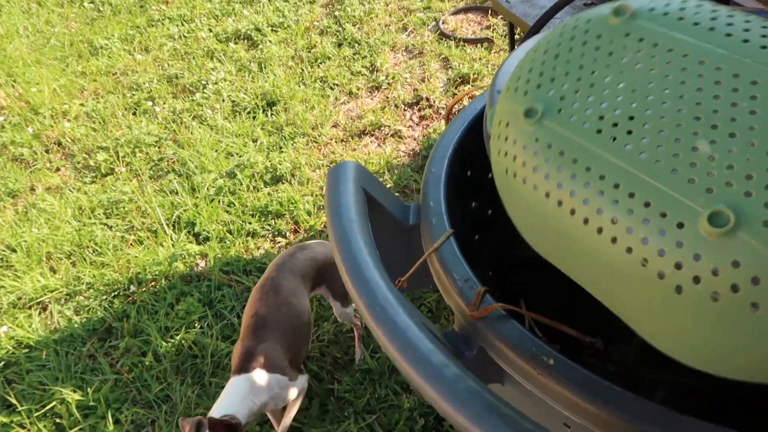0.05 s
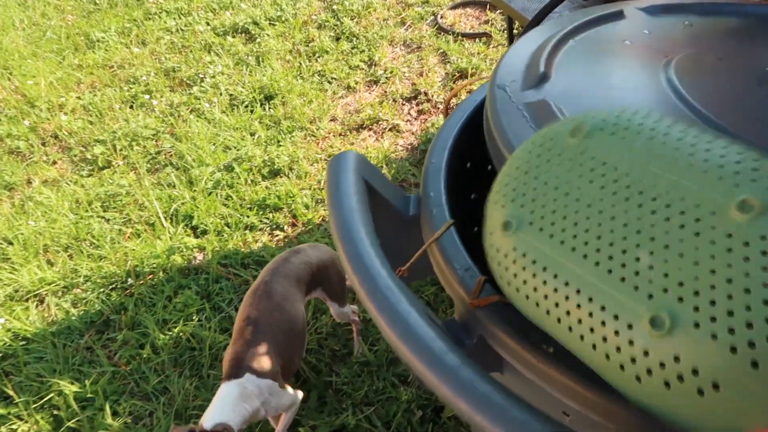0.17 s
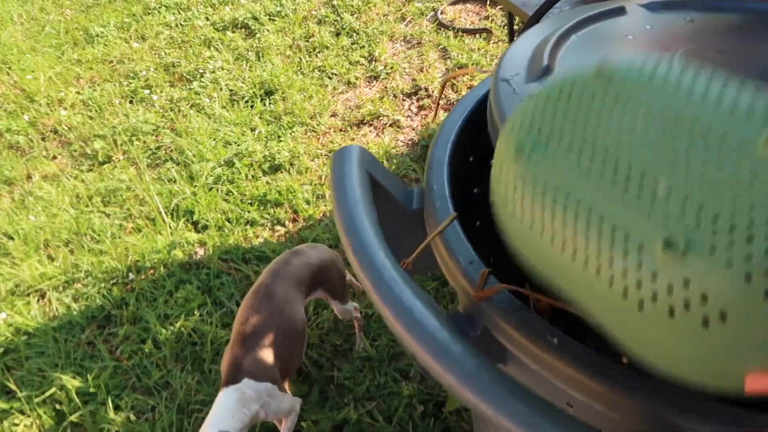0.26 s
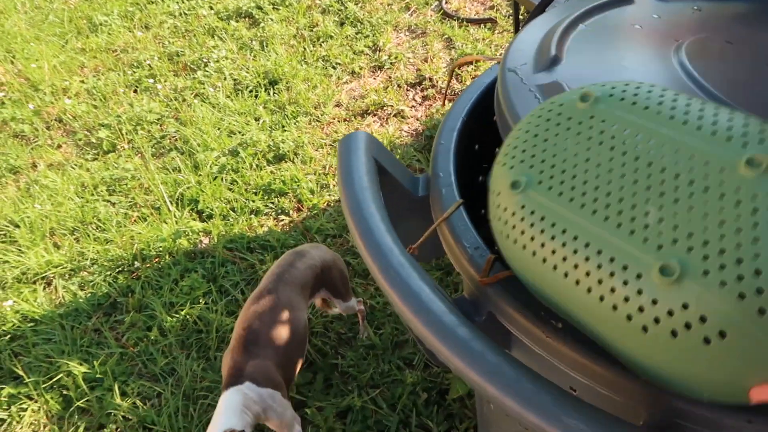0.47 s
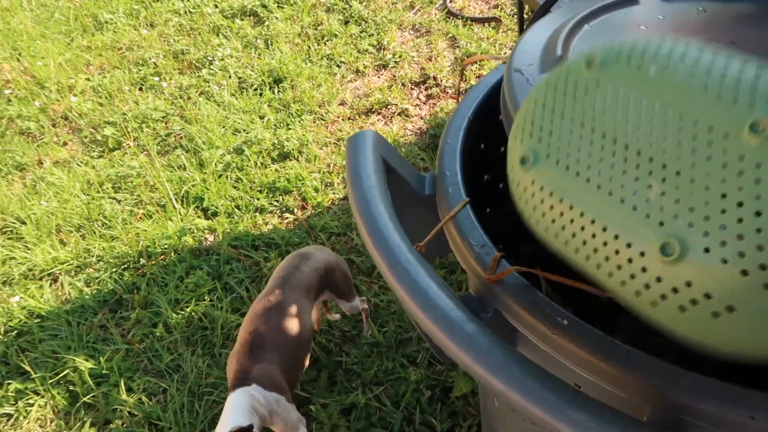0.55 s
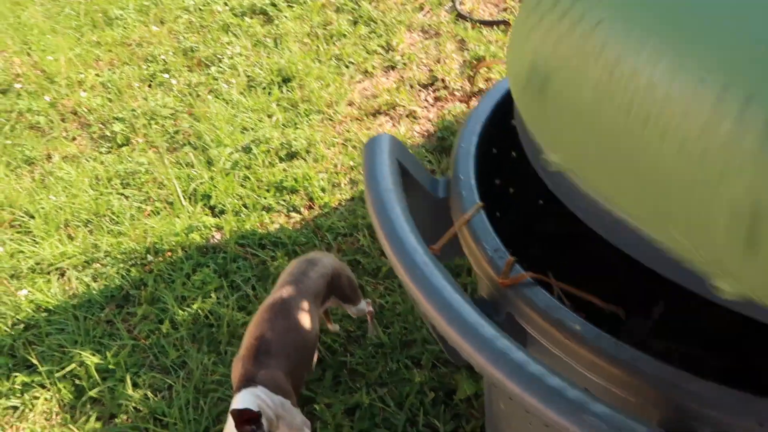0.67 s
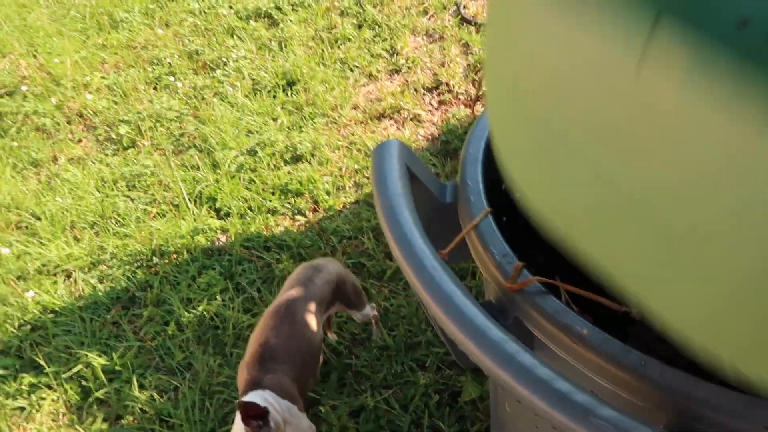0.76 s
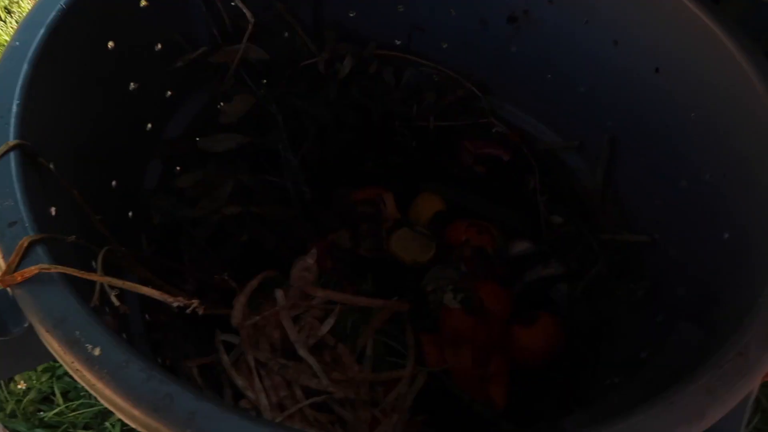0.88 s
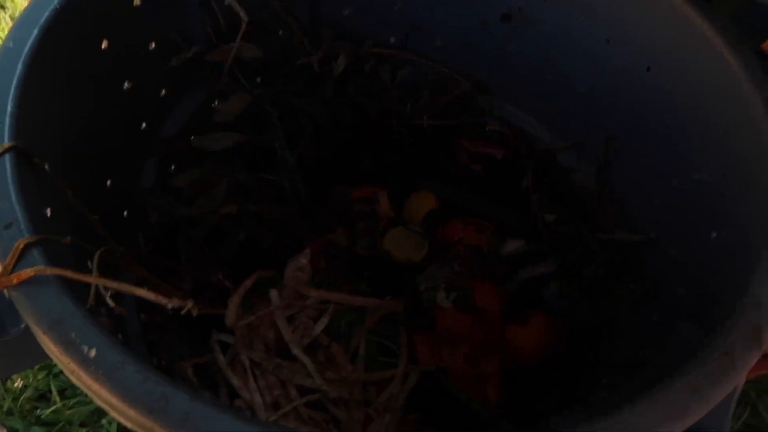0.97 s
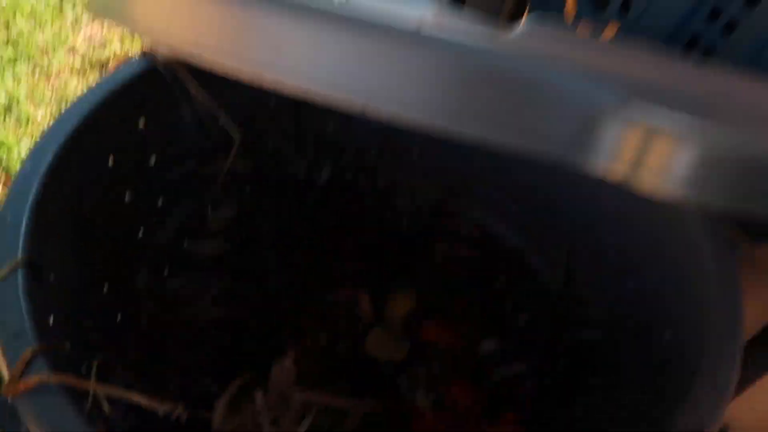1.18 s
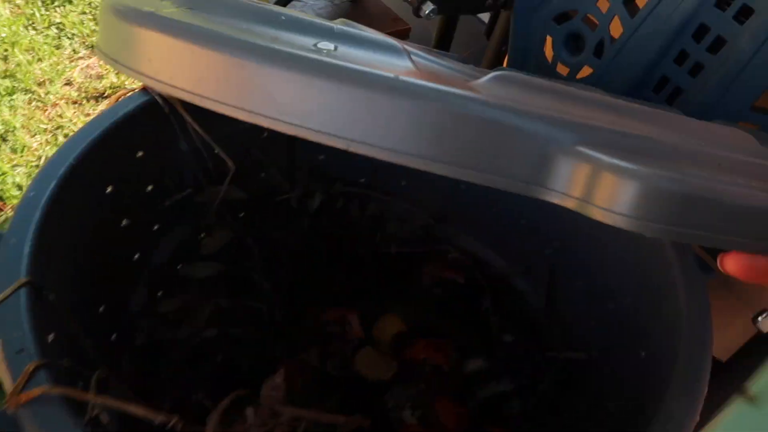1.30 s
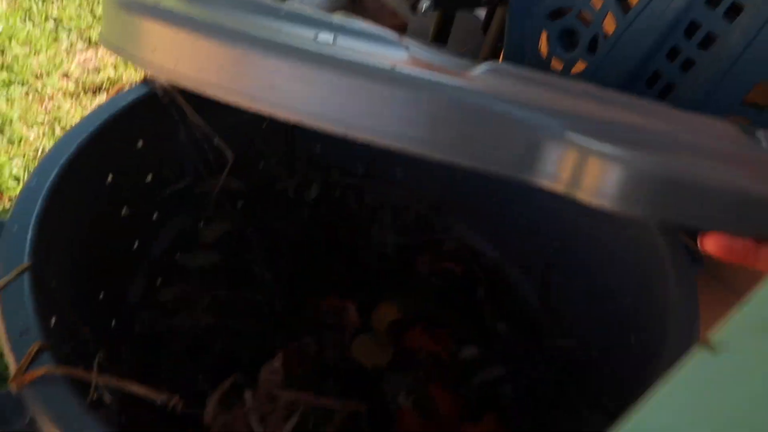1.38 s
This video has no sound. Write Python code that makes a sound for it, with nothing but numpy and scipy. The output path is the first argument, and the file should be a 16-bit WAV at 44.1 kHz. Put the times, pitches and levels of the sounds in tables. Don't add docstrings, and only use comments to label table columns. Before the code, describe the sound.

Hard plastic knocks of a colander on a compost bin, close in a yard with low distant traffic and machinery hum. At 0.2 s a sharp, distorted blow bounces at 0.25; at 0.47 a second hollow blow bounces at 0.52, with soft low bumps to 0.6. The hum ducks after the blows. At 0.88 an abrupt cut restores it, with faint scrap ticks, soft bumps, and light leaf rustle from 1.2.

```python
import sys
import numpy as np
from scipy import signal
from scipy.fft import rfft, irfft, next_fast_len
from scipy.io import wavfile
from scipy.ndimage import uniform_filter1d, map_coordinates

SR = 44100
rng = np.random.default_rng(int(sys.argv[2]) if len(sys.argv) > 2 else 0)


def to_wav(s):
    ch = np.atleast_2d(s).T
    pcm = np.round(np.clip(ch, -1, 1) * 32767)
    wavfile.write(sys.argv[1], SR, pcm.astype(np.int16))


def nominal_scale(level):
    x = np.asarray(level, float) / 20
    return 10 ** x


N = 63945
CUT_S = 0.877

# frequency in Hz, density in dB per Hz.
HUM_COLOUR = [(15, -38.5), (28, -14), (64, -3.5), (266, -10.5), (508, -15), (4740, -39), (11500, -55.5),
              (15500, -78)]
# frequency in Hz, likeness from 0 to 1.
HUM_LIKENESS = [(30, 0.6), (60, 1), (180, .85), (550, 0.28), (1650, 0.79), (5000, 0.23), (15000, 0.087)]
# frequency in Hz, left over right in dB.
HUM_TILT = [(60, -1.5), (380, 3), (2380, 3), (15000, -2.5)]
# centre in Hz, width in Hz, level in dB.
MACHINE_DRONES = [(59, 14, -49), (79, 12, -54.5), (234.5, 22, -50), (337, 40, -47.5)]
# start in seconds, length in seconds, level in dB.
EDGE_SCRAPES = [
    (0.2015, 0.005, -8.5),
    (.466, 0.0043, -19.5),
]
# time in seconds, ring level in dB, sharpness in Hz, crack level in dB.
FIRST_CONTACTS = [
    (.2049, 9, 9960, -1),
    (.2115, -15, 6000, -14),
    (.2300, -21, 5000, -19),
    (.2517, -2.5, 3920, -6),
    (.2585, -15, 3500, -18.5),
]
SECOND_CONTACTS = [
    (0.4727, 6.5, 3468, -0.5),
    (.4790, -4.5, 5000, -0.5),
    (.5243, -2, 5000, -3.5),
    (.5305, -13, 5000, -17),
]
# frequency in Hz, level in dB, 60 dB decay in seconds.
FIRST_MODES = [(259, -7.5, 0.3), (454, -17, 0.071), (706.5, -8, .05), (786.2, -4, 0.08), (863, -3.5, .09),
               (907.7, -3.5, 0.049), (1107, -6.5, 0.035), (1374, -7, 0.03), (1540, -18, 0.076),
               (1730, -15, 0.061), (1870, -17.5, 0.019), (2106, -21, 0.013), (2620, -8, 0.018),
               (5000, -10.5, 0.03)]
SECOND_MODES = [(200, -7, 0.16), (397, -13, 0.13), (650, -9.5, 0.15), (769, -10, 0.1), (831.4, -2.5, 0.056),
                (917, -4, 0.04), (1097, -2, 0.042), (1440, -11.5, 0.019), (1640, -3, 0.013),
                (1749, -9, 0.023), (2010, -15.5, 0.053), (2366, -14.5, 0.012), (3043, -12, 0.036),
                (4390, -9.5, 0.017)]
# frequency in Hz, level in dB.
CRACK_COLOUR = [(300, -16), (1500, 7.5), (3000, -1), (5000, -3.5), (8000, -18.5), (11000, -35),
                (15000, -52)]
# frequency in Hz, 60 dB decay in seconds.
WALL_DECAY = [(200, .12), (1000, 0.13), (4000, 0.05), (10000, .03)]
# frequency in Hz, 60 dB decay in seconds.
YARD_DECAY = [(200, .4), (1000, 0.25), (3500, 0.46), (10000, 0.076)]
# frequency in Hz, left over right in dB.
KNOCK_TILT = [(100, 0), (500, 1.2), (1500, 2.3), (4000, 3.2), (9000, 8)]
# time in seconds, level in dB, pitch in Hz.
BIN_BUMPS = [(.42, -27, 236), (0.425, -23.5, 67.2), (.497, -6, 206), (0.543, -15.5, 133),
             (.572, -16.5, 200), (.265, -16.5, 216), (0.323, -23, 71), (.59, -35, 95), (0.949, -22, 70),
             (0.959, -28, 203), (1.161, -25, 67), (1.201, -26, 55), (1.29, -25, 79)]
# time in seconds, peak level in dB, pitch in Hz.
SCRAP_TICKS = [(.8784, -55, 4500), (.8924, -46, 3920), (.9222, -47, 3500), (.9394, -54, 3580),
               (.962, -54, 3500), (1.0045, -50, 4200), (1.013, -49, 3700), (1.046, -48, 4200),
               (1.063, -49, 3800), (1.0873, -44, 4700), (1.1044, -53, 4300), (1.1288, -49, 3900),
               (1.1707, -42, 4760), (1.444, -45, 7100)]
# frequency in Hz, level in dB.
GRIT_COLOUR = [(1500, -37), (3000, 1), (5000, 3), (9000, -25), (14000, -44.5)]
CLICK_COLOUR = [(1000, -6), (12000, -13), (15000, -42)]
# time in seconds, level in dB.
LEAF_SWELLS = [
    (0.881, -71.5),
    (1.15, -72),
    (1.2, -60.5),
    (1.26, -71),
    (1.33, -63),
    (1.45, -61.5),
]
# frequency in Hz, level in dB.
LEAF_COLOUR = [(1000, -20), (3000, -5.5), (7500, -5), (11000, -13.5), (14000, -30), (15500, -50)]


def unit(x):
    return x / np.sqrt(np.mean(x ** 2) + 1e-20)


def along(points, hz):
    f, v = np.transpose(points)
    return np.interp(np.log(hz + 1), np.log(f + 1), v)


def filtered(x, response):
    m = next_fast_len(x.shape[-1] + 8192)
    spectrum = rfft(x, m) * response(np.fft.rfftfreq(m, 1 / SR))
    return irfft(spectrum, m)[..., :x.shape[-1]]


def noise(colour):
    return unit(filtered(rng.standard_normal(N), lambda f: nominal_scale(along(colour, f))))


def wobble(rate):
    knots = rng.standard_normal(int(N * rate / SR) + 4)
    return map_coordinates(knots, [np.arange(N) * rate / SR])


def ports(x, tilt, lead_s):
    half = np.array([[0.5], [-0.5]])
    return filtered(x, lambda hz: nominal_scale(half * along(tilt, hz)) * np.exp(2j * np.pi * hz * half * lead_s))


def hum():
    z = signal.stft(rng.standard_normal((2, N + 512)), nperseg=512)[2]
    patches = uniform_filter1d(rng.standard_normal(z.shape[1:]), 5, 0)
    patches = unit(uniform_filter1d(patches, 8, 1))
    pair = signal.istft(z * nominal_scale(1.2 * patches), nperseg=512)[1][:, :N]

    def mid_side_balance(hz):
        turn = np.arccos(np.clip(along(HUM_LIKENESS, hz), -1, 1)) / 2
        return nominal_scale(along(HUM_COLOUR, hz)) * np.array([np.cos(turn), np.sin(turn)])

    mid, side = filtered(pair, mid_side_balance)
    wash = nominal_scale(-38.5 + 1.2 * wobble(12)) * unit(np.array([mid + side, mid - side]))
    drone = np.zeros(N)
    for centre, width, db in MACHINE_DRONES:
        band = filtered(rng.standard_normal(N), lambda f: 1 / (1 + (2 * (f - centre) / width) ** 2))
        drone += nominal_scale(db) * unit(band)
    scene_db = np.where(np.arange(N) / SR < CUT_S, -0.5, 0)
    return nominal_scale(scene_db) * ports(wash + drone, HUM_TILT, lead_s=0.00011)


def scrape(start_s, length_s, db):
    RISE_DB = 11.5
    rise = np.clip((np.arange(N) / SR - start_s) / length_s, 0, 1)
    return nominal_scale(db + RISE_DB * (rise - 1.5)) * np.sin(np.pi * rise) ** 0.5 * noise(CRACK_COLOUR)


def reverberated(x, decay):
    hz, t, z = signal.stft(rng.standard_normal((2, SR // 2)), SR, nperseg=128)
    t60 = np.maximum(along(decay, hz), 0.005)[:, None]
    tail = signal.istft(z * nominal_scale(-60 * t / t60), SR, nperseg=128)[1]
    tail = tail / np.linalg.norm(tail[0])
    return signal.fftconvolve(x[None], tail, axes=1)[:, :N]


def knock(contacts, modes, edge_scrape):
    MOST_CYCLES, LONGEST_S = 75, 0.1
    SPREAD_DB = 0.5
    FLUTTER_DB, FLUTTER_RATE = 3.5, 88
    RADIATES_HZ = 479
    BRIEF = 0.25
    CRACK_T60_S = 0.02
    RING_TO_BUZZ_DB, BUZZ_DB = 2, -7
    YARD_DB, YARD_DELAY_S, YARD_DULL_HZ = -18, 0.015, 5500
    t = np.arange(N) / SR
    ring, blow, crack = np.zeros(N), np.zeros(N), np.zeros(N)
    hz, level, t60 = np.transpose(modes)[:, :, None]
    t60 = np.minimum(np.minimum(t60, MOST_CYCLES / hz), LONGEST_S)
    flutter = nominal_scale(FLUTTER_DB * np.array([wobble(FLUTTER_RATE) for _ in modes]))
    for s, db, sharp_hz, crack_db in contacts:
        def softness(f):
            radiation = (1j * f / (RADIATES_HZ + 1j * f)) ** 2
            return radiation / (1 + 1j * f / sharp_hz) ** 3

        u = np.maximum(t - s, 0)
        mode_db = db + level + SPREAD_DB * rng.standard_normal(hz.shape)
        tones = nominal_scale(mode_db) * np.sin(2 * np.pi * hz * u)
        ring -= filtered((tones * flutter * nominal_scale(-60 * u / t60)).sum(0), softness)
        blow -= filtered((tones * nominal_scale(-60 * u / (BRIEF * t60))).sum(0), softness)
        snap = nominal_scale(crack_db - 60 * u / CRACK_T60_S) * (t >= s) * noise(CRACK_COLOUR)
        crack += filtered(snap, softness)
    crack += scrape(*edge_scrape)
    buzz = nominal_scale(BUZZ_DB) * reverberated(crack + blow * nominal_scale(RING_TO_BUZZ_DB), WALL_DECAY)[0]

    def yard_path(f):
        return np.exp(-2j * np.pi * f * YARD_DELAY_S) / (1 + 1j * f / YARD_DULL_HZ) ** 2

    yard = nominal_scale(YARD_DB) * reverberated(filtered(blow + crack, yard_path), YARD_DECAY)
    return ports(ring + crack + buzz, KNOCK_TILT, lead_s=0.00005) + yard


def ducking():
    ATTACK_S, RECOVER_DB_PER_S, FADE_S = 0.014, 5.5, 0.008
    t = np.arange(N) / SR
    first_s, second_s = FIRST_CONTACTS[0][0], SECOND_CONTACTS[0][0]
    db = np.zeros(N)
    for s, duck_db in [(first_s, -12.5), (second_s, -4.5)]:
        db += duck_db * (1 - np.exp(-np.maximum(t - s, 0) / ATTACK_S))
    db = np.minimum(db + RECOVER_DB_PER_S * np.maximum(t - first_s, 0), 0)
    return nominal_scale(db * np.clip((CUT_S - t) / FADE_S + 0.5, 0, 1))


def thuds():
    T60_S, ATTACK_S = 0.059, 0.0017
    out = np.zeros(N)
    for s, db, hz in BIN_BUMPS:
        u = np.maximum(np.arange(N) / SR - s, 0)
        out += nominal_scale(db - 60 * u / T60_S) * (1 - np.exp(-u / ATTACK_S)) * np.sin(2 * np.pi * hz * u)
    return out


def ticks():
    T60_S, RISE_S, GRIT_DB = 0.012, 0.00076, -3
    CLICK_S, CLICK_DB, CLICK_T60_S = 0.9592, -53, 0.0084
    out, t = np.zeros(N), np.arange(N) / SR
    for s, db, hz in SCRAP_TICKS:
        u = np.maximum(t - s, 0)
        envelope = nominal_scale(db - 60 * u / T60_S) * (1 - np.exp(-(u / RISE_S) ** 2))
        grit = nominal_scale(GRIT_DB) * noise(GRIT_COLOUR)
        out += envelope * (np.sin(2 * np.pi * hz * u) + grit)
    u = t - CLICK_S
    click = nominal_scale(CLICK_DB - 60 * np.abs(u) / CLICK_T60_S) * (u > 0) * noise(CLICK_COLOUR)
    return out + click


def rustle():
    t = np.arange(N) / SR
    s, db = np.transpose(LEAF_SWELLS)
    level = nominal_scale(np.interp(t, s, db) + 2.6 * wobble(60)) * (t > CUT_S)
    return level * np.array([noise(LEAF_COLOUR), noise(LEAF_COLOUR)])


def scene():
    first = knock(FIRST_CONTACTS, FIRST_MODES, EDGE_SCRAPES[0])
    second = knock(SECOND_CONTACTS, SECOND_MODES, EDGE_SCRAPES[1])
    return hum() + first + second + thuds() + ticks() + rustle()


def roll_off(x):
    return signal.sosfilt(signal.butter(12, 15610, fs=SR, output="sos"), x)


def record(dry):
    CEILING, TOP_HZ, EDGE_HZ = 1.03, 15600, 300
    clipped = np.clip(dry * ducking(), -CEILING, CEILING)
    mix = filtered(clipped, lambda hz: np.clip((TOP_HZ - hz) / EDGE_HZ + 0.5, 0, 1))
    return roll_off(mix)


dry = scene()
out = record(dry)
to_wav(out)
```